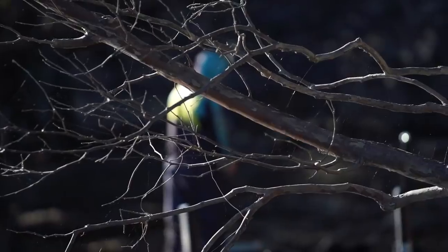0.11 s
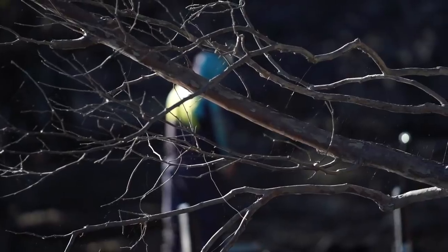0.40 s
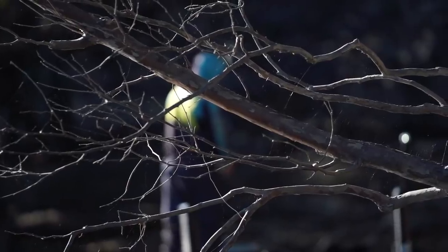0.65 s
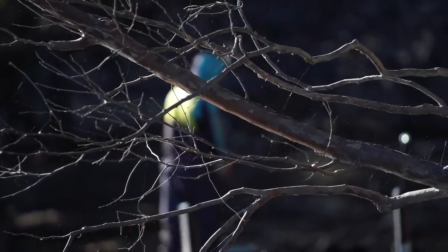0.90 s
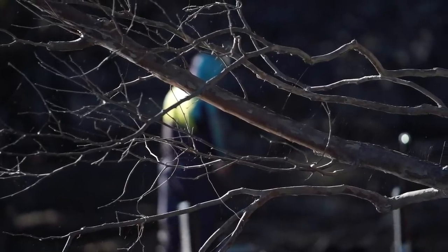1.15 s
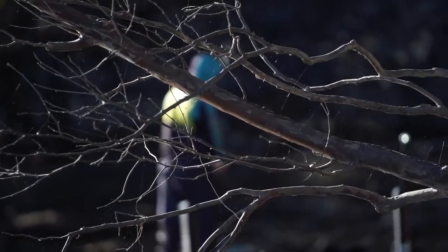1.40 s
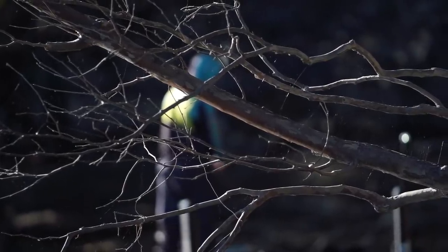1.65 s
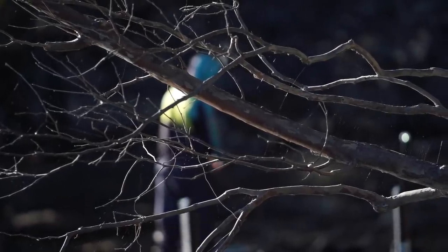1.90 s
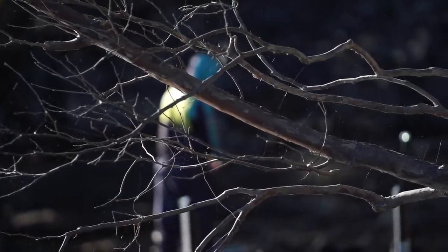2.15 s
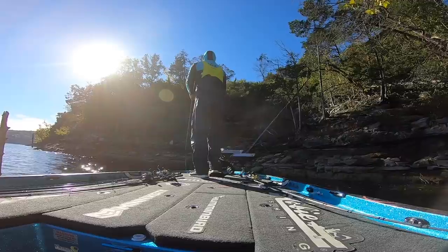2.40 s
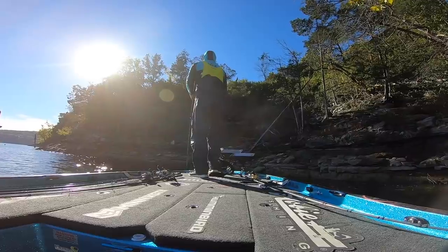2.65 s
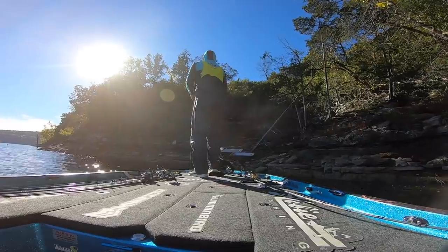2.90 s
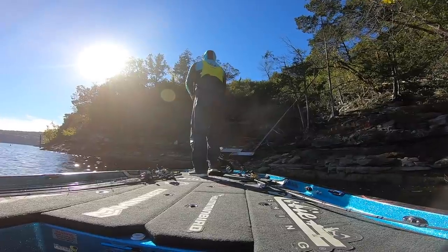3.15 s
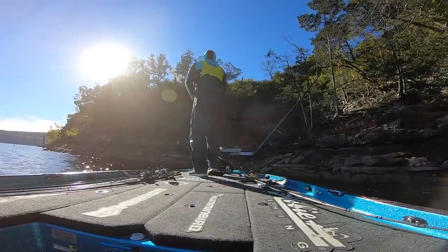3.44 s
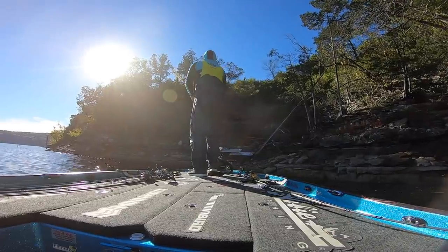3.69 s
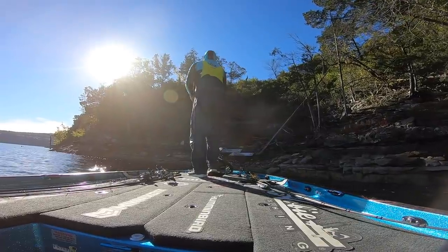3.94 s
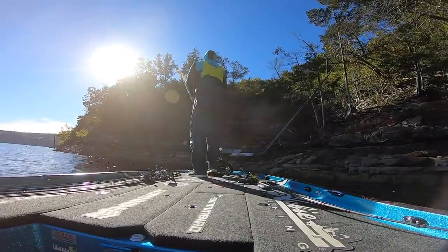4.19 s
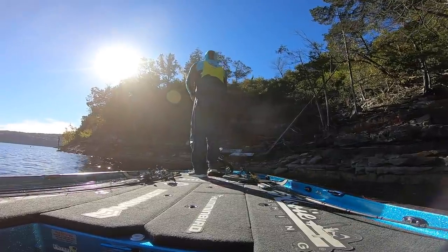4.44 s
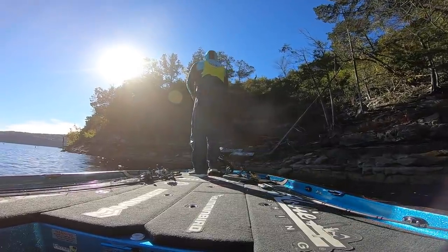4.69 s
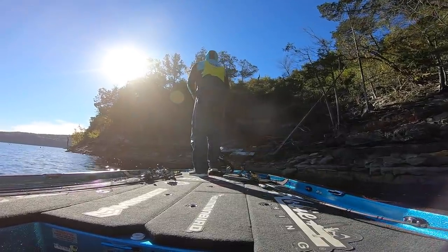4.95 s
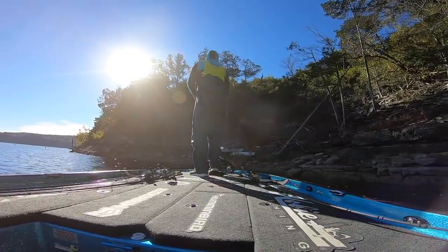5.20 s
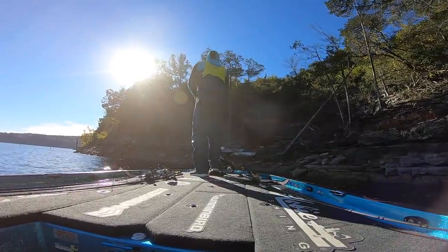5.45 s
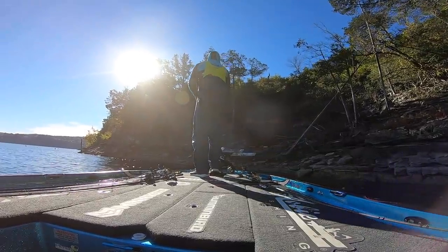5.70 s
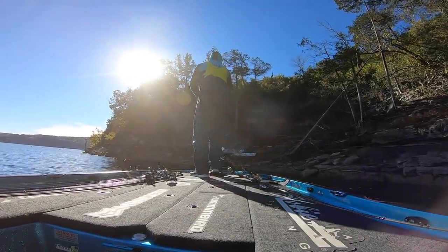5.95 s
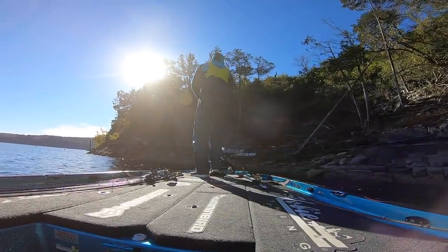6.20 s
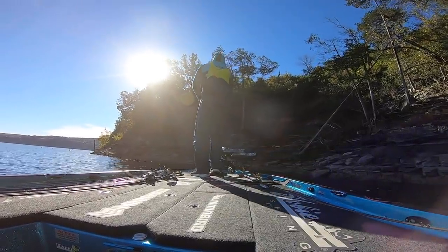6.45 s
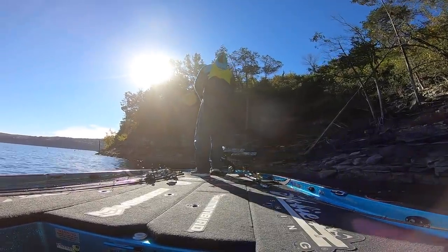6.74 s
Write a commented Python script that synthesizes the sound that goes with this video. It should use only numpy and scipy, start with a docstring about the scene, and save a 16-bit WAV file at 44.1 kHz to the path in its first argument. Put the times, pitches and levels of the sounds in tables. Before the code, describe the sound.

Close, wide stereo water sounds around a small drifting boat. Fine fizz and trickling come in short uneven surges, dotted with sharp little slaps, rounded bubble plops and occasional crisp ticks. Beneath lie a soft deck drone, slow swell and a weak steady hum from a pump and far engine. Deep wind puffs buffet the microphone in the first second and return briefly after four seconds. Outdoors, close to the hull, with faint hiss.

```python
"""Near the shore of a lake, a small boat drifts, heard from a two-port microphone fixed to the deck.
Swell is low noise, the deck drone is noise shaped by pitch; a far engine and a pump are wavering sines.
Wavelets lap the side: crowds of short rings and noise make fizz, slosh, gurgles and droplets.
Single rings make hollow plops, rings with noise make sharp slaps, and bright noise makes tiny ticks.
Wind puffs on the ports are very low noise; still air and microphone hiss are faint steady noise."""
import sys
import numpy as np
from scipy import signal
from scipy.fft import rfft, irfft, next_fast_len
from scipy.io import wavfile

SR = 44100
rng = np.random.default_rng(int(sys.argv[2]) if len(sys.argv) > 2 else 0)


def amplitude_ratio(level_db):
    """Convert a level in decibels to the matching linear amplitude (field) ratio."""
    exponent = np.asarray(level_db, float) / 20
    return 10 ** exponent


def master(y):
    """Save y as 16-bit WAV."""
    cut = np.clip(np.atleast_2d(y).T, -1, 1)
    pcm = np.round(cut * 32767)  # scale
    wavfile.write(sys.argv[1], SR, pcm.astype(np.int16))


N = 301945   # length in samples


def rms_one(x):
    """Scale to rms 1."""
    return x / np.sqrt(np.mean(x ** 2) + 1e-20)


def at_hz(points, hz, axis=1):
    """Read one column of a table between its rows, on a log-frequency axis."""
    points = np.array(points)
    return np.interp(np.log(hz + 1), np.log(points[:, 0]), points[:, axis])


def drift(rate_hz):
    """Slow random wander of spread 1, worked out at every 40th sample."""
    r = np.exp(-80 * np.pi * rate_hz / SR)
    slow = signal.lfilter([1], [1, -2 * r, r * r], rng.standard_normal(N // 40 + 2002))
    slow = slow[2000:]   # skip the filter's start
    return np.interp(np.arange(N) / 40, np.arange(len(slow)), rms_one(slow - slow.mean()))


def band(x, low_hz, high_hz, order=2):
    """Keep only the pitches between two limits."""
    return signal.sosfilt(signal.butter(order, [low_hz, high_hz], "band", fs=SR, output="sos"), x)


def coloured(x, spectrum):
    """Shape a signal's loudness by pitch; rms 1."""
    size = next_fast_len(N)
    gain = amplitude_ratio(at_hz(spectrum, np.fft.rfftfreq(size, 1 / SR)))
    return rms_one(irfft(rfft(x, size) * gain, size)[:N])


def grains(per_s, low_hz, high_hz, cycles, spread_db, count=16):
    """Random births of uneven size; each bubble swells and dies over some cycles at one of count pitches."""
    sizes = amplitude_ratio(spread_db * np.minimum(rng.exponential(1, N), 3.5)) * rng.choice([-1, 1], N)
    clicks = sizes * (rng.random(N) < per_s / SR)
    dealt = rng.integers(0, count, N)
    out = 0
    for k, hz in enumerate(np.geomspace(low_hz, high_hz, count)):
        r = amplitude_ratio(-60 * hz / (cycles * SR))
        w = 2 * np.pi * hz / SR
        pole = [1, 0, -1, 1, -2 * r * np.cos(w), r * r]
        ring = signal.sosfilt([pole, pole], clicks * (dealt == k) + 1e-18)   # twice: a soft start
        out = out + hz ** 2 * ring
    return rms_one(out)


def add(out, s, x):
    """Mix a short sound in at time s."""
    i = round(s * SR)
    out[i:i + len(x)] += x[:N - i]


def surges(rows, calm_db, rise, fall, axis=1):
    """Level in dB: every surge climbs to its crest and drains away (dB per s), over a calm level."""
    t = np.arange(0, N + 40, 40) / SR
    rows = np.array(rows)
    after = t - rows[:, :1]
    surge_db = rows[:, axis, None] + np.minimum(rise * after, -fall * after)
    power = amplitude_ratio(2 * surge_db).sum(0) + amplitude_ratio(2 * calm_db)
    return np.interp(np.arange(N) / SR, t, 10 * np.log10(power))


def scattered(x, path_s, size=2048):
    """The same sound by way of many short paths off moving water: new paths every moment."""
    starts = np.arange(0, len(x), size // 2)
    t = np.arange(size) / SR
    padded = np.pad(x, (size // 2, 2 * size))
    pieces = padded[starts[:, None] + np.arange(size)] * np.sin(np.pi * t * SR / size)
    paths = rng.standard_normal(pieces.shape) * np.exp(-t / path_s)
    paths /= np.sqrt(np.sum(paths ** 2, axis=1, keepdims=True))
    out = np.zeros(len(x) + 3 * size)
    for i, piece in zip(starts, signal.fftconvolve(pieces, paths, axes=1)):
        out[i:i + len(piece)] += piece
    return out[size // 2:size // 2 + len(x)]


def swell(swell_db):
    """The swell drums the hull: low noise that rises and falls with each lift."""
    return amplitude_ratio(swell_db) * rms_one(band(rng.standard_normal(N), 49.0, 78.8, order=4))


def deck_drone(swell_db, engine_db, gurgle_db):
    """The deck drones with swell and engine, and thumps with the wavelets: noise shaped by pitch."""
    # Loudness of the drone by pitch. Each row: frequency in Hz, relative level in dB per Hz.
    rumble = [(55, -34), (94, 3), (119, -6.5), (172, -6), (242, -18), (300, -28), (390, -55), (660, -120)]
    from_swell = 0.3 * (swell_db - swell_db.mean())
    from_engine = 0.13 * (engine_db - engine_db.mean())
    resting = amplitude_ratio(-42.5 + from_swell + from_engine)
    thump = amplitude_ratio(gurgle_db + 9.5)
    return np.hypot(resting, thump) * coloured(rng.standard_normal(N), rumble)


def far_engine(engine_db):
    """A far engine: sines on multiples of one turning rate, each wavering in level by itself."""
    # Firing orders of the engine. Each row: multiple of the turning rate, relative level in dB.
    orders = [(2, -1), (3, -15.5), (4, -20)]
    turn_hz = 43.82 * (1 + 0.006 * drift(2.19))
    turn = 2 * np.pi * np.cumsum(turn_hz) / SR
    out = np.zeros(N)
    for order, db in orders:
        level = np.sqrt(2) * amplitude_ratio(engine_db + db + drift(6))
        out += level * np.sin(order * turn + rng.uniform(0, 2 * np.pi))
    return out


def pump():
    """A pump holds one note: a steady sine whose level wavers slightly around -48 dB rms."""
    t = np.arange(N) / SR
    return np.sqrt(2) * amplitude_ratio(-48 + drift(7.0)) * np.sin(2 * np.pi * 163.9 * t)


def lapping(fizz_db, slosh_db, gurgle_db):
    """Stronger lapping bursts more bubbles, in clumps, over a wash; big pockets gurgle, droplets plip."""
    # Loudness of the fizz by pitch. Each row: frequency in Hz, relative level in dB per Hz.
    fizz_colour = [(530, -14.5), (900, -3.5), (1460, 0.5), (1750, -4.5), (2150, -2.5), (2530, -10.5),
                   (3490, -5.5), (3860, -14.5), (4860, -14), (5710, -6.5), (8240, -28.5), (12500, -43.5),
                   (14000, -40.5)]
    busy = amplitude_ratio(0.54 * (fizz_db - fizz_db.mean()) + 4 * drift(12))   # multiplies the births per second
    burst = grains(1100 * busy, 912, 9220, cycles=13.4, spread_db=6.5, count=22)
    wash = rng.standard_normal(N) * amplitude_ratio(2.5 * drift(21))
    fizz = amplitude_ratio(fizz_db) * coloured(burst + 1.34 * wash, fizz_colour)
    slosh = amplitude_ratio(slosh_db) * grains(260 * busy, 420, 957, cycles=10.1, spread_db=0.5, count=9)
    pockets = grains(200, 208, 357, cycles=9.0, spread_db=3.5, count=6)
    gurgle = amplitude_ratio(gurgle_db - 4.0) * rms_one(band(pockets, 195, 380))
    # rounder droplets, 8 dB under the fizz
    drips = amplitude_ratio(fizz_db - 8) * grains(40 * busy, 520, 1700, cycles=22.0, spread_db=3.0, count=14)
    return fizz + slosh + gurgle + drips


def still_air():
    """Still air: faint steady noise shaped by pitch."""
    # Loudness of the air by pitch. Each row: frequency in Hz, relative level in dB per Hz.
    air_colour = [(150, -33.5), (250, -4), (431, -16), (731, -10), (1010, -40), (1300, -17), (2170, -24),
                  (2530, -24.5), (3390, -27), (3900, -22), (5760, -26.5), (7000, -31.5), (9100, -62),
                  (15400, -120)]
    return amplitude_ratio(-66.5) * coloured(rng.standard_normal(N), air_colour)


def wind():
    """Wind puffs on the ports: lumpy noise, mostly below 50 Hz, partly each port's own."""
    # Puffs of wind. Each row: time of the crest in seconds, level in dB before the ports' own gains.
    puffs = [(.09, -25), (.28, -24.5), (.46, -30), (.72, -32.5), (.92, -29), (1.27, -39), (1.42, -35),
             (1.7, -41), (1.98, -41), (2.8, -42), (3.05, -46.5), (3.89, -40.5), (4.42, -29.5), (5.15, -32),
             (5.8, -40), (6.2, -31), (6.5, -40)]
    wind_db = surges(puffs, calm_db=-54, rise=197, fall=203)
    lumps = amplitude_ratio(2 * drift(3.5))
    shared, *own = band(rng.standard_normal((3, N)), 16, 46, order=3) * lumps
    port_gain = amplitude_ratio(np.array([[-5.5], [3.0]]))   # left, right
    return amplitude_ratio(wind_db) * rms_one(shared + 0.75 * np.array(own)) * port_gain


def slaps():
    """Each slap: a drop's pitched ring, and a briefer crack and spray that grow together."""
    # Drops and crests hitting the hull. Each row: time in seconds, level in dB, starting pitch in Hz,
    # strength of the spray in dB (it also drives the crack).
    strikes = [(.004, -35, 1450, -27), (0.0971, -41, 1950, -18), (0.1085, -50, 1410, 13),
               (0.2004, -42.5, 5720, -18), (0.2378, -47, 5630, -13), (.267, -41.5, 1490, -16),
               (0.3182, -38.5, 1520, -27), (.3395, -41, 1240, -29), (0.37, -55, 3500, 1),
               (0.424, -31.5, 1490, -51), (0.5712, -46, 1610, -29), (0.641, -50, 1430, -26.5),
               (0.659, -41, 1910, -19), (0.6707, -39, 1370, -9), (0.8654, -39, 2340, -9.5),
               (.872, -46, 1880, -25), (1.117, -40.5, 1480, -15), (1.1623, -43.5, 1550, -22),
               (1.181, -48, 3020, -10), (1.212, -48.5, 1226, -2.5), (1.2946, -41, 1540, -7.5),
               (1.3364, -44.5, 3260, 2), (1.3575, -39.5, 1170, -11.5), (1.4591, -41, 1400, 7),
               (1.5085, -39, 2080, -2), (1.549, -41, 1290, -17), (1.6257, -32.5, 1280, -4.5),
               (1.665, -34, 1570, -9), (1.711, -46, 1600, -3), (1.7436, -44, 1730, -21),
               (1.8588, -43.5, 1570, -14), (2.0847, -36.5, 1670, -19), (2.126, -35, 1290, -18),
               (2.2087, -31.5, 2020, -13), (2.2488, -38, 3420, -14), (2.2578, -31.5, 1140, -11.5),
               (2.2746, -23.5, 1370, -34), (2.4405, -52, 1220, -15), (2.7096, -44.5, 1380, -14.5),
               (2.826, -49.5, 2320, -2.5), (2.936, -46, 1300, -11), (3.002, -38, 2260, -8),
               (3.0198, -34, 1350, -7.5), (3.021, -41, 2250, -20), (3.136, -47, 1810, -16.5),
               (3.1755, -36, 1820, -18), (3.361, -40, 1170, -17), (3.468, -49, 1230, -33),
               (3.548, -42.5, 1280, -23), (3.6163, -37, 1340, -41), (3.794, -46.5, 2140, -9.5),
               (3.8282, -40, 2070, -29), (3.9986, -48.5, 1534, -1), (4.187, -41, 1180, -26),
               (4.6722, -43, 4300, -3), (4.752, -40, 1880, -2.5), (4.9516, -41, 2050, -5),
               (5.0003, -46, 1220, 4.5), (5.053, -40, 1280, -18), (5.2495, -33, 1300, -47),
               (5.2878, -34, 2700, -23), (5.4945, -31, 1730, -23), (5.5148, -41.5, 3700, -0.5),
               (5.542, -41.5, 2800, -12), (5.7803, -47.5, 1210, 0), (5.8345, -48, 1310, -10),
               (5.982, -41, 1280, -33), (6.1192, -49, 2100, -16), (6.1502, -30.5, 1605, -48),
               (6.2742, -57.5, 1280, 6.5), (6.4278, -40.5, 3180, -6), (6.439, -43.5, 1160, -12),
               (6.5127, -33.5, 2050, -19), (6.519, -32.5, 1400, -25), (6.6138, -41.5, 1120, -12),
               (6.6545, -56, 6000, 4.5)]
    out, t = np.zeros(N), np.arange(round(.08 * SR)) / SR
    for (s, db, hz, spray_db), noise in zip(strikes, rng.standard_normal((len(strikes), 2, len(t)))):
        # seconds to fall 60 dB: harder slaps and smaller drops die sooner
        ring_s = 0.019 * amplitude_ratio(0.35 * (-42 - db)) * (1500 / hz) ** 0.29
        fade = amplitude_ratio(-60 * t / ring_s)
        tone = (1 - np.exp(-t * hz / 1.2)) * np.sin(2 * np.pi * hz * t * (1 + 3 * t))
        crack = amplitude_ratio(0.64 * spray_db + 4.5) * rms_one(band(noise[0], 1100, 2800))
        spray = amplitude_ratio(spray_db + 3.0) * rms_one(band(noise[1], 3800, 6390, order=3))
        brief = (1 - np.exp(-t / 0.0013)) * amplitude_ratio(-1800 * t)
        add(out, s - .001, amplitude_ratio(db) * fade * (tone + brief * (crack + spray)))
    return out


def plops():
    """A trapped pocket rings as a sine that swells, bends and dies; a smaller one beside it joins late."""
    # Air pockets closing. Each row: time in seconds, level in dB, pitch in Hz, ring length in cycles,
    # pitch bend as a share of the pitch (below zero it falls).
    pockets = [(.106, -47, 614, 21, 0.022), (0.527, -42.5, 866, 14, 0.088), (.669, -47.5, 794, 8, 0.036),
               (.806, -47, 772, 26, -0.19), (.866, -55.5, 876, 14, -0.012), (1.003, -51, 900, 9.8, 0.3),
               (1.066, -49.5, 784, 10, -0.17), (1.092, -34, 376, 8.2, 0.24), (1.114, -39, 487, 6, 0.073),
               (1.292, -42.5, 453, 7, 0.074), (1.442, -51, 670, 21, 0.088), (1.457, -39.5, 717, 33, 0.086),
               (1.703, -41, 489, 11, -0.03), (2.093, -44.5, 1100, 12, .1), (2.257, -47.5, 450, 7.5, -0.065),
               (2.597, -56.5, 628, 12, .1), (2.773, -53, 754, 9.2, 0.14), (3.02, -50.5, 530, 19, -0.0085),
               (3.135, -32.5, 612, 3.8, 0.34), (3.528, -35, 614, 8.5, -0.27),
               (3.549, -36.5, 565, 6.7, 0.29), (3.695, -56.5, 652, 54, .65), (3.905, -53, 760, 9, 0.15),
               (3.997, -50, 775, 12, 0.22), (4.082, -40.5, 457, 13, -.1), (4.105, -29.5, 572, 7.3, 0.18),
               (4.147, -39, 532, 5.4, 0.23), (4.2, -37.5, 340, 5, 0.053), (4.239, -43.5, 693, 7, 0.097),
               (4.435, -59, 858, 22, -0.11), (4.567, -44, 655, 7.8, .1), (4.784, -38, 763, 5.1, 0.32),
               (4.954, -52.5, 870, 16, -0.0074), (5.056, -28, 685, 5.4, 0.38),
               (5.091, -41.5, 1090, 13.6, -0.08), (5.113, -35, 473, 8.1, 0.075),
               (5.253, -39, 1090, 9.8, 0.019), (5.299, -47, 540, 8.6, 0.094),
               (5.481, -38.5, 333, 3.9, -0.18), (5.493, -27, 277, 5.3, 0.22), (5.942, -54, 666, 9, .05),
               (5.978, -42.5, 795, 21, .02), (6.283, -44, 1060, 12, 0.097), (6.323, -50, 636, 20, 0.00064),
               (6.511, -43.5, 401, 28, 0.086), (6.515, -47.5, 834, 41, 0.16)]
    out, t = np.zeros(N), np.arange(round(.12 * SR)) / SR
    for (s, db, hz, cycles, bend), chance in zip(pockets, rng.random((len(pockets), 3))):
        wobble, smaller, late = chance
        n = t * hz / max(cycles, 2)   # time in ring lengths
        shape = (1 - np.exp(-t * hz / 1.44)) * amplitude_ratio(-14 * n ** 1.22)
        shape = shape * (1 + 0.2 * np.sin(8 * n + 2 * np.pi * wobble))
        turn = 2 * np.pi * hz * t * (1 - bend / 2 + bend * np.minimum(n, 1.5) / 2)
        add(out, s - .002, amplitude_ratio(db) * shape * np.sin(turn))
        beside = shape ** 1.7 * np.sin((1.15 + .6 * smaller) * turn)
        add(out, s + 0.011 * late, amplitude_ratio(db - 13.5) * beside)
    return out


def ticks():
    """A tiny bursting film: a few milliseconds of bright noise."""
    # Tiny crisp ticks. Each row: time in seconds, strength in dB before the tick's rise and fall.
    films = [(0.1137, -61), (0.2364, -63), (1.335, -41), (1.6292, -52), (1.6891, -61), (2.1592, -57.5),
             (2.2513, -56), (3.0192, -63), (3.312, -51.5), (3.9976, -57), (4.0877, -52.5), (4.8376, -55.5),
             (4.9994, -45.5), (6.154, -58.5)]
    out, t = np.zeros(N), np.arange(round(0.02 * SR)) / SR
    shape = (1 - np.exp(-t / 0.0037)) * amplitude_ratio(-60 * t / 0.0079)
    for (s, db), noise in zip(films, rng.standard_normal((len(films), len(t)))):
        add(out, s - .0005, amplitude_ratio(db) * shape * rms_one(band(noise, 6300, 12500, order=1)))
    return out


def deck_echo(x):
    """Dense short reflections off gunwale and water."""
    return band(scattered(x, path_s=0.015), 320, 5200)


def swell_knock():
    """One swell under the hull: a short low sine that rises and sinks."""
    hz, length_s = 64, .108
    out, t = np.zeros(N), np.arange(round(length_s * SR)) / SR
    shape = np.sqrt(np.sin(np.pi * t / length_s))
    add(out, .565, amplitude_ratio(-14.5) * shape * np.sin(2 * np.pi * hz * t))
    return out


def ports(x, spread, size=4096):
    """The left port hears the right port's sound at another level and phase, partly by scattered paths.

    A source of small spread scatters less; the mean of both ports keeps x's colour."""
    # Left port against right. Each row: frequency in Hz, level in dB, lead in radians,
    # likeness from 0 to 1 for a source of spread 1.
    port_match = [(43, -8.6, -.3, .84), (100, -7.4, 0, .94), (190, -9.5, .3, .9), (290, -8, 1.7, .65),
                  (410, -5.2, 3.5, .75), (590, -9.4, 4.8, .55), (830, -7, 2.2, .65),
                  (1200, -3.5, 1.75, .88), (1700, -2.3, 1.7, .85), (2800, -3, .85, .78),
                  (4000, -5, .3, .72), (5600, -2, -.7, .7), (7200, 2.5, -1.5, .3), (10000, -.5, -1.6, .1)]
    x = np.pad(x, size, "reflect", reflect_type="odd")
    whole = next_fast_len(len(x))
    hz = np.fft.rfftfreq(whole, 1 / SR)
    alike = np.clip(at_hz(port_match, hz, axis=3), 0, 1) ** spread
    ratio = amplitude_ratio(at_hz(port_match, hz)) * np.exp(1j * at_hz(port_match, hz, axis=2))
    right = 2 / np.sqrt(1 + abs(ratio) ** 2 + 2 * alike * ratio.real)
    direct = rfft(x, whole)
    stray = rfft(scattered(x, path_s=0.0077), whole)
    left = right * ratio * (alike * direct + np.sqrt(1 - alike ** 2) * stray)
    return irfft(np.array([left, right * direct]), whole)[:, size:size + N]


def scene():
    """Hull, water and still air through the two ports, wind on top; a few milliseconds of fade-in."""
    # Loudness of the far engine as it reaches the hull. Each row: time in seconds, level in dB.
    engine_points = [(0, -29.5), (.19, -38.5), (.28, -29), (.38, -37.5), (.58, -30.5), (.72, -37.5),
                     (.91, -33), (1.31, -36.5), (1.43, -34), (1.66, -36), (1.75, -35), (2.7, -33),
                     (2.8, -31), (3.05, -33.5), (3.35, -32.5), (3.46, -29), (3.9, -28.5), (4.05, -33.5),
                     (4.5, -28.5), (4.6, -36), (4.88, -38.5), (5.14, -34), (5.22, -41.5), (5.7, -38),
                     (6.05, -57.5), (6.2, -37), (6.35, -41), (6.45, -56), (6.85, -50.5)]
    # Swells lifting the hull. Each row: time of the crest in seconds, level in dB.
    lifts = [(.05, -33.5), (.44, -29.5), (.66, -33.5), (.8, -31), (1.18, -32), (1.4, -30.5), (1.75, -32.5),
             (2.14, -34.5), (2.6, -37), (3.17, -34.5), (3.5, -31.5), (3.89, -33.5), (4.5, -33.5),
             (4.65, -34), (4.9, -39.5), (5.25, -39.5), (5.82, -31.5), (6.28, -35), (6.7, -43)]
    # Wavelets reaching the side. Each row: time of the crest in seconds, fizz level in dB,
    # gurgle drive in dB (it sets gurgle, slosh and thump).
    wavelets = [(0.0, -56, -56), (0.231, -60.5, -57), (.42, -61.5, -66), (.57, -69, -45), (.78, -64, -53),
                (1.02, -57.5, -62), (1.1, -64.5, -45), (1.19, -61.5, -59), (1.299, -61.5, -41.5),
                (1.48, -54.5, -50.5), (1.71, -59.5, -41), (1.871, -58.5, -58.5), (2.11, -54, -40.5),
                (2.27, -57.5, -50), (2.4, -64.5, -57.5), (2.629, -69, -67), (2.801, -62, -59.5),
                (3.03, -59, -48.5), (3.2, -59.5, -58), (3.299, -63, -57), (3.429, -69, -53.5),
                (3.531, -66.5, -46.5), (3.75, -62.5, -49.5), (4.1, -65.5, -60.5), (4.219, -60, -44.5),
                (4.33, -63.5, -53), (4.42, -69.5, -60.5), (4.54, -62.5, -48), (4.71, -59, -63),
                (4.86, -64.5, -48), (5.02, -54.5, -42.5), (5.17, -66.5, -52.5), (5.29, -54, -62.5),
                (5.38, -71, -54), (5.491, -59.5, -43), (5.589, -57, -50.5), (5.83, -57.5, -59.5),
                (5.991, -62.5, -44), (6.13, -60.5, -60), (6.3, -58.5, -53.5), (6.43, -59, -57.5),
                (6.54, -62, -48.5), (6.72, -62.5, -54.5)]
    engine_s, engine_level = np.transpose(engine_points)
    engine_db = np.interp(np.arange(N) / SR, engine_s, engine_level)
    swell_db = surges(lifts, calm_db=-41, rise=120, fall=75)
    fizz_db = surges(wavelets, calm_db=-69, rise=132, fall=71)
    gurgle_db = surges(wavelets, calm_db=-64, rise=297.5, fall=245.5, axis=2)
    slosh_db = -68.5 + 0.43 * (fizz_db - fizz_db.mean()) + 0.24 * (gurgle_db - gurgle_db.mean())

    hull = swell(swell_db) + deck_drone(swell_db, engine_db, gurgle_db)
    hull += far_engine(engine_db) + pump() + swell_knock()
    hits = slaps() + plops() + ticks()
    water = lapping(fizz_db, slosh_db, gurgle_db) + amplitude_ratio(-3) * deck_echo(hits)
    wide = ports(hull + water + still_air(), spread=1.6)
    near = ports(hits, spread=0.68)
    fade_in = np.minimum(np.arange(N) / (.004 * SR), 1)
    return fade_in * (wide + near + wind())


def band_limit(x):
    """A steep low-pass at the top of the band."""
    return signal.sosfilt(signal.butter(12, 14120, fs=SR, output="sos"), x)


def record(dry):
    """Each of the microphone's two capsules adds its own faint hiss: noise shaped by pitch."""
    # Loudness of the hiss by pitch. Each row: frequency in Hz, relative level in dB per Hz.
    hiss_colour = [(4120, -31), (7000, -2.5), (8280, -11.5), (12300, -15), (14000, -31)]
    own_noise = [coloured(white, hiss_colour) for white in rng.standard_normal((2, N))]
    mix = dry + amplitude_ratio(-79.5) * np.array(own_noise)
    return band_limit(mix)


dry = scene()
out = record(dry)
master(out)
```